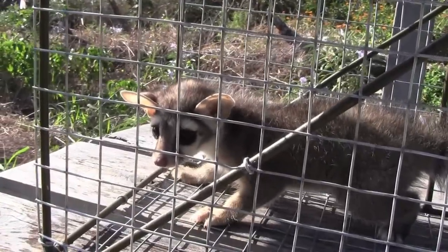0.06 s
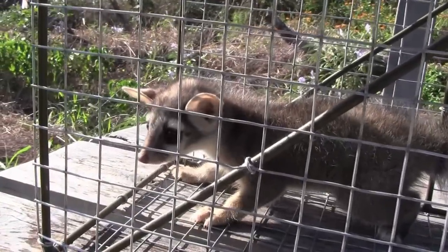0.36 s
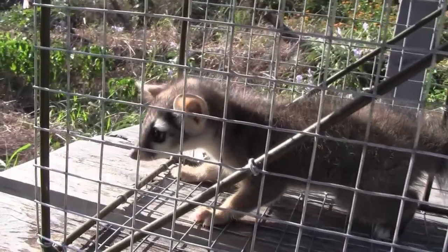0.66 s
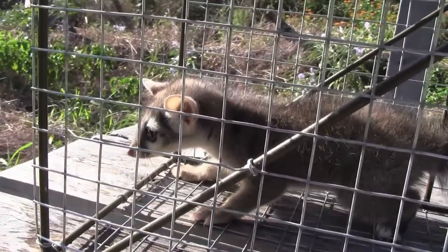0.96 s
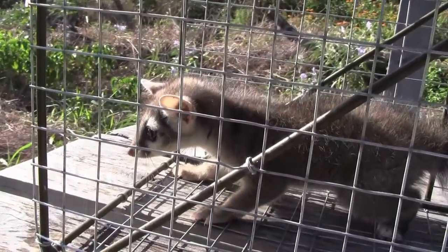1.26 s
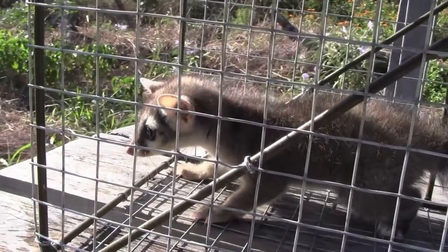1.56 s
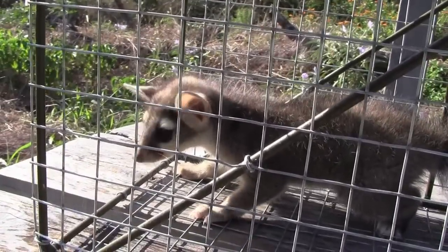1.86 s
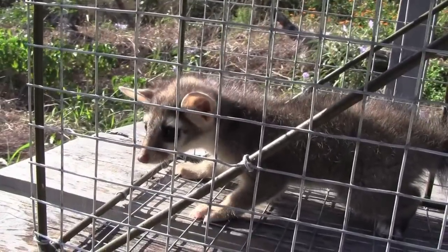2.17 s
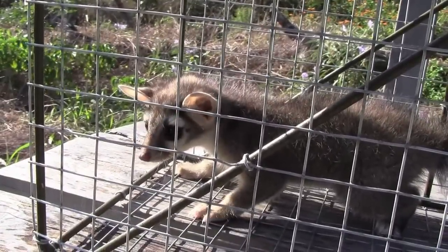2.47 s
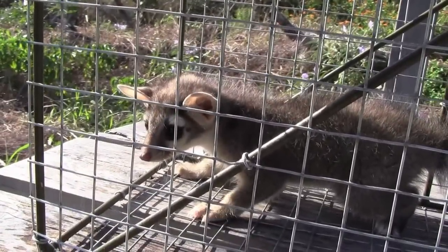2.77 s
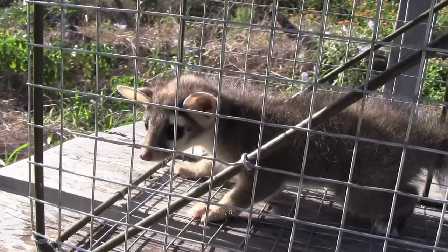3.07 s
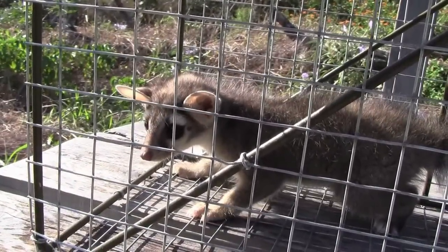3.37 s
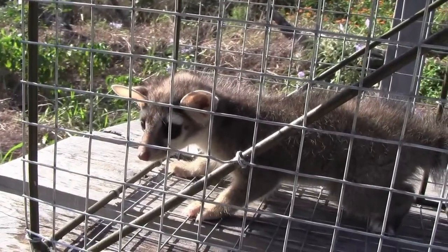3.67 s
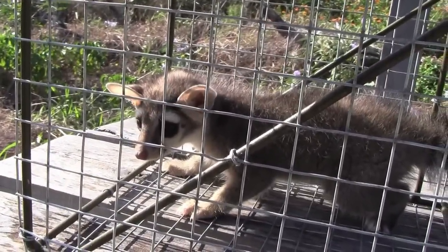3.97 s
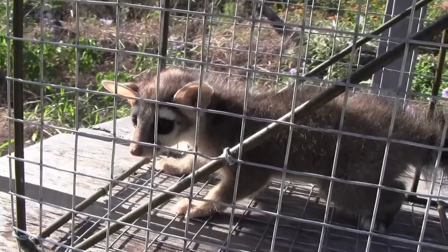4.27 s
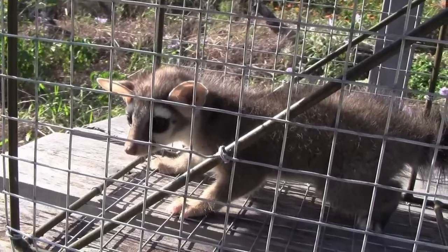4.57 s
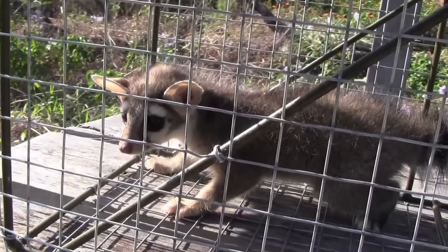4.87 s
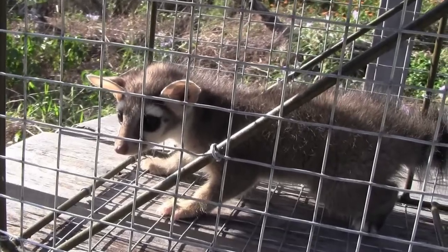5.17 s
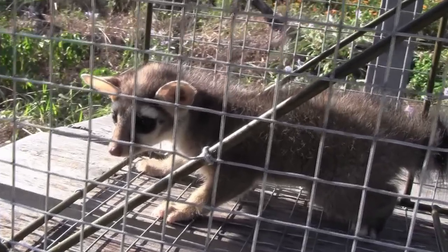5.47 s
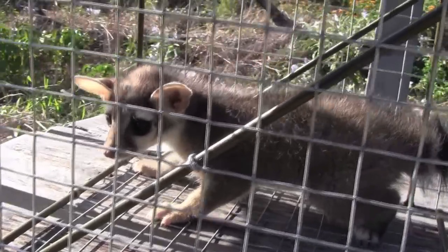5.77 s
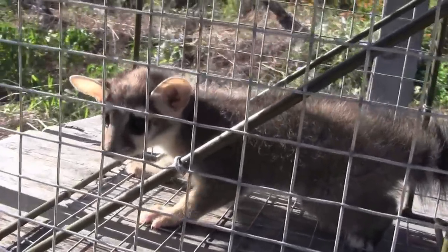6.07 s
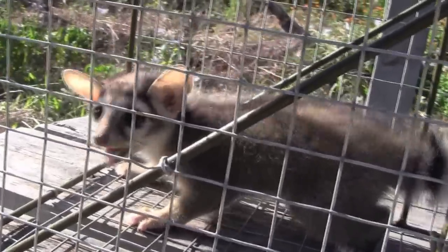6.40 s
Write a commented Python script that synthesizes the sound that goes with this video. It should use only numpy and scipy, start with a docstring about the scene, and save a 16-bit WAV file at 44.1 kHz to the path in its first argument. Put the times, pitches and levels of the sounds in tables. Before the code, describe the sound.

A small caged animal gives faint, short barking chirps in a quiet garden, then scrabbles, hisses and breaks into a loud, harsh bark.

```python
"""A garden hushes and far birds sing. From about 1 s a small wild mammal, close by in a wire cage,
gives eight faint barking chirps, each a short creak of the throat that ends in a hollow pip.
Near 5.9 s its claws start to tick on the cage and its fur brushes the wire. At 6.3 s it hisses
through its opening mouth, and in the last instant it breaks into a loud, harsh bark."""
import sys
import numpy as np
from scipy import signal
from scipy.fft import rfft, irfft
from scipy.io import wavfile
from scipy.ndimage import uniform_filter1d

SR = 44100
rng = np.random.default_rng(int(sys.argv[2]) if len(sys.argv) > 2 else 0)


def materialize(psi):
    """Save the field psi as 16-bit PCM at rate SR to the path in sys.argv[1].

    A 1-D psi becomes a single channel; in a 2-D psi each row is a channel.
    """
    bounded = np.clip(np.atleast_2d(psi).T, -1, 1)
    quanta = np.round(bounded * 32767).astype(np.int16)
    wavfile.write(sys.argv[1], SR, quanta)


N = 292721


def gain_of(db):
    """Decibels to gain."""
    return 10 ** (np.asarray(db) / 20)


def unit_rms(x):
    """Scaled to rms 1."""
    return x / np.sqrt(np.mean(x ** 2) + 1e-20)


def ramp(t, start, length):
    """Rises evenly from 0 to 1 over length, beginning at start."""
    return np.clip((t - start) / length, 0, 1)


def curve_at(points, hz):
    """Reads a curve on a log-frequency axis."""
    f, value = np.transpose(points)
    return np.interp(np.log(hz + 1), np.log(f + 1), value)


def add(mix, s, sound):
    """Mixes a sound in at time s."""
    part = mix[max(round(s * SR), 0):][:len(sound)]
    part += sound[:len(part)]


def eq(x, points, size=4096):
    """Causal filter of unit energy, shaped by points of f/Hz, level/dB."""
    log_gain = np.log(gain_of(curve_at(points, abs(np.fft.fftfreq(size, 1 / SR)))))
    ring = np.fft.ifft(np.exp(np.conj(signal.hilbert(log_gain)))).real[:size // 2]
    return signal.fftconvolve(x, ring / np.linalg.norm(ring))[:len(x)]


def wander(count, hz):
    """Smooth random modulation, rms about 1, moving at up to about hz."""
    f = np.fft.rfftfreq(SR, 1 / SR)
    return unit_rms(irfft(rfft(rng.standard_normal(SR)) * np.exp(-(f / hz) ** 2), SR))[:count]


def pan(x, right_db):
    """Mono to stereo, louder on the right by right_db."""
    return x * gain_of([[-right_db / 2], [right_db / 2]])


def reverb(x, t60, predelay):
    """Scattered reflections, different at each ear."""
    t = np.arange(SR // 2) / SR
    taps = rng.standard_normal((2, len(t))) * gain_of(-60 * t / t60) * (t > predelay)
    return signal.fftconvolve(x[None], taps / np.linalg.norm(taps[0]), axes=1)[:, :N]


# tone of the background bed: f/Hz, relative level/dB
GARDEN_EQ = [(22, -32), (40, -35), (72, -11), (150, -0.5), (250, -8), (400, -10), (560, -7), (800, -7),
             (1250, -10.5), (2000, -18.5), (3200, -25), (5500, -30), (12000, -34.5), (14800, -47.5)]
# its stereo width: f/Hz, left-right correlation
GARDEN_CORRELATION = [(60, 0.78), (130, 1), (290, -0.3), (630, 0.0014), (1370, 0.37), (3000, 0.13),
                      (6550, 0.32), (14300, -0.71)]
# its balance: f/Hz, left over right/dB
GARDEN_BALANCE = [(100, 0.47), (370, -1.2), (900, -2.13), (2300, -0.67), (7800, -0.98), (14300, 1)]
# slow fader ride on its mids, taken about the mean: t/s, level/dB
HUSH_RIDE = [(0.0, -57), (0.37, -57), (1.14, -55.5), (1.75, -58), (2.56, -56.5), (3.44, -57), (3.96, -56),
             (5.51, -58), (6.3, -55.5)]


def garden(level_db=-55, patchy_db=1.0, hush_lift_db=2.3):
    """Distant rumble and wide hush. A faint high background hiss is turned down from about 4.4 s."""
    frames, hz = N // 512 + 5, np.fft.rfftfreq(2048, 1 / SR)
    t = np.arange(frames) * 512 / SR
    a, b, c, d, patches = rng.standard_normal((frames, len(hz), 5)).T
    patches = unit_rms(uniform_filter1d(uniform_filter1d(patches, size=16, axis=0), size=8, axis=1))
    shared = np.clip(curve_at(GARDEN_CORRELATION, hz), -1, 1)[:, None]
    left = a + 1j * b
    right = shared * left + np.sqrt(1 - shared ** 2) * (c + 1j * d)
    balance = gain_of(np.outer([.5, -.5], curve_at(GARDEN_BALANCE, hz)))[:, :, None]
    spectra = np.array([left, right]) * balance / np.sqrt(.744 + shared)
    # each band follows the two rides to its own depth
    s, ride_db = np.transpose(HUSH_RIDE)
    hush_ride = np.interp(t, s, ride_db - ride_db.mean() + hush_lift_db)
    high_hiss_ride = 6.8 - 11.1 * ramp(t, start=4.35, length=.35)
    hush = np.outer(curve_at([(200, .52), (600, .9), (2000, .95), (6000, .25)], hz), hush_ride)
    high_hiss = np.outer(curve_at([(4000, .0055), (8000, .12), (12500, .65)], hz), high_hiss_ride)
    spectra *= gain_of(curve_at(GARDEN_EQ, hz)[:, None] + hush + high_hiss + patchy_db * patches)
    air = signal.istft(spectra, nperseg=2048, noverlap=1536)[1][:, :N]
    return gain_of(level_db) * air / air.mean(0).std()


def whistle(length, first_hz, middle_hz, last_hz, level_db, buzz):
    """A gliding tone; buzz shakes its pitch into a blurred twitter."""
    u = np.linspace(0, 1, round(length * SR))
    glide = np.polyval(np.polyfit([0, .5, 1], [first_hz, middle_hz, last_hz], 2), u)
    hz = glide * (1 + .095 * buzz * wander(len(u), 380))
    flutter = gain_of(2.5 * wander(len(u), 45))
    fade = signal.windows.tukey(len(u), .4)
    return gain_of(level_db) * unit_rms(np.sin(2 * np.pi * np.cumsum(hz) / SR) * flutter * fade)


def warble(start_s=.89, length_s=.75, notes_per_s=8, note_s=.04, centre_hz=3330):
    """A bird's run of short notes, growing louder, each sliding up or down around its own pitch."""
    out = np.zeros(N)
    starts = np.arange(0, length_s, 1 / notes_per_s)
    for s, (late, pitch, slide) in zip(starts, rng.uniform(-.91, 1, (len(starts), 3))):
        hz, glide = centre_hz * (1 + .17 * pitch), .049 * slide
        level_db = np.interp(s, [0, length_s], [-70, -67])
        note = whistle(note_s, hz * (1 - glide), hz, hz * (1 + glide), level_db, buzz=.2)
        add(out, start_s + s + late * note_s / 2, note)
    return out


# slurred bird whistles: t/s, length/s, first f/Hz, last f/Hz, pre-fader level/dB, buzz/0-1
BIRD_SLURS = [(1.269, 0.046, 2650, 2880, -60, 0.3), (1.404, 0.035, 3180, 3450, -64, 0.2),
              (1.491, 0.065, 4540, 3400, -62, 0.5), (2.675, 0.07, 3410, 3530, -60, 0.03),
              (2.756, .17, 3540, 3780, -63.5, 0.18), (5.071, 0.1, 2560, 3010, -64, 0),
              (5.081, .07, 4580, 4900, -65, .2), (5.104, .07, 5620, 5860, -68.5, .1),
              (5.243, 0.11, 4080, 3510, -58.5, 0.03), (5.387, 0.032, 3540, 3450, -62.5, .05)]
# buzzy twitters that arch in pitch: t/s, length/s, top f/Hz, pre-fader level/dB
BIRD_TWITTERS = [(1.733, .18, 3940, -63.5), (3.118, 0.17, 4120, -66), (3.957, .1, 4020, -62.5),
                 (4.121, .12, 3970, -63), (4.167, .09, 5800, -65.5), (4.704, .126, 4070, -64.5)]


def birds(slur_arch=1.018, twitter_sag=.07, dry_db=-6.5, wet_db=-11.5):
    """Far songbirds warble, whistle and twitter, blurred by the trees."""
    out = warble()
    for s, length, first_hz, last_hz, level_db, buzz in BIRD_SLURS:
        middle_hz = slur_arch * (first_hz + last_hz) / 2
        add(out, s, whistle(length, first_hz, middle_hz, last_hz, level_db, buzz))
    for s, length, top_hz, level_db in BIRD_TWITTERS:
        ends_hz = top_hz * (1 - twitter_sag)
        add(out, s, whistle(length, ends_hz, top_hz, ends_hz, level_db, buzz=.58))
    trees = reverb(out, t60=.435, predelay=.01074)
    return gain_of(dry_db) * pan(out, right_db=1.5) + gain_of(wet_db) * trees


def brush(length, hz, level_db, grain_db=4):
    """One rub: a short swell of grainy noise."""
    count = round(length * SR)
    grains = rng.standard_normal(count) * gain_of(grain_db * wander(count, 203))
    sound = eq(grains, [(hz / 2, -22), (hz / 1.2, 0), (hz * 1.1, 0), (hz * 1.7, -14), (hz * 4, -35)])
    return gain_of(level_db) * unit_rms(sound * np.hanning(count))


# fur on the wire: t/s, length/s, centre f/Hz, level/dB
FUR_BRUSHES = [(3.272, .061, 7160, -75), (4.803, .073, 6560, -78), (5.322, .095, 11000, -77.5),
               (5.735, .14, 7500, -77), (5.977, .172, 5950, -70), (6.26, 0.13, 3900, -70)]


def rustles():
    """Fur brushes the wire, and a paw slides on the boards at the first step."""
    out = np.zeros(N)
    for s, length, hz, level_db in FUR_BRUSHES:
        add(out, s, brush(length, hz, level_db))
    add(out, CLAW_STEPS[0][0], brush(length=.078, hz=805, level_db=-58))
    return out


def tick(peak_db, hz, t60, scrape=.16):
    """One claw lands: a sharp contact and a short, dry scrape."""
    t = np.arange(SR // 20) / SR
    contact = (t == 0) + scrape * rng.standard_normal(len(t)) * gain_of(-60 * t / t60)
    sound = eq(contact, [(hz / 8, -18), (hz / 1.7, -1), (hz * 1.5, -1), (hz * 3, -18), (hz * 8, -40)])
    return gain_of(peak_db) * sound / abs(sound).max()


# firm claw hits: t/s, peak level/dB, centre f/Hz, scrape t60/s
CLAW_STEPS = [(5.8742, -27.5, 2430, 0.011), (5.879, -28.5, 8800, 0.018), (6.0443, -34.5, 8460, .0045),
              (6.1569, -40.5, 600, 0.015), (6.2566, -37, 1290, 0.0076), (6.3037, -34.5, 1450, .0076),
              (6.4090, -29, 1355, .039), (6.471, -30, 2390, 0.013), (6.5860, -30, 4000, .006)]


def claws(shuffle_s=(5.88, 7.2), shuffle_per_s=14):
    """Firm steps on the cage, with lighter random ticks as the animal shifts its feet."""
    out = np.zeros(N)
    for s, peak_db, hz, t60 in CLAW_STEPS:
        add(out, s, tick(peak_db, hz, t60))
    times = np.arange(*shuffle_s, 1 / shuffle_per_s)
    for s, (late, size, pitch) in zip(times, rng.uniform(-.87, 1, (len(times), 3))):
        light = tick(peak_db=-44 + 3 * size, hz=4200 * 2 ** pitch, t60=.012)
        add(out, s + abs(late) / shuffle_per_s, light)
    return out


# dark tone of the throat, mouth shut: f/Hz, relative level/dB
SHUT_MOUTH_EQ = [(100, -52.5), (230, -0.5), (340, 7.5), (520, 10.5), (760, 2), (1000, 2.5), (1350, -16),
                 (2000, -30), (4000, -76)]
# thin lisp of air through the teeth: f/Hz, relative level/dB
LISP_EQ = [(3000, -20.5), (5800, -14), (7100, 1), (8300, 2), (10000, -0.5), (11500, -15), (14000, -16.5)]


def creak(count, level_db, ring_db, lisp_db, pulse_hz=191, growth_db=8, uneven_db=2.4,
          ring_hz=770, ring_t60=.035):
    """A few throat pulses that grow; air spits before each, and the last leaves the throat ringing."""
    t = np.arange(-.01, .07, 1 / SR)
    order = np.arange(count)
    starts = order / pulse_hz
    sizes_db = growth_db * (order / order[-1] - 1) + uneven_db * rng.standard_normal(count)
    pulses = np.zeros(len(t))
    pulses[np.searchsorted(t, starts)] = gain_of(sizes_db)
    # each pulse is a rounded push of pressure, muffled by the shut mouth
    muffle = gain_of(curve_at(SHUT_MOUTH_EQ, np.fft.rfftfreq(len(t), 1 / SR)))
    voice = irfft(rfft(pulses) * muffle, len(t))
    after = np.maximum(t - starts[-1], 0)
    ring = np.cos(2 * np.pi * ring_hz * after) * gain_of(ring_db - 60 * after / ring_t60) * after / .0035
    spits = .4 + 2 * np.cos(np.pi * (pulse_hz * t + .3)) ** 8
    puff = np.exp(-((t - starts[-1] / 2) / (.9 * starts[-1])) ** 4)
    flutter = gain_of(3 * wander(len(t), 150))
    air = eq(rng.standard_normal(len(t)), LISP_EQ) * spits * puff * flutter
    return gain_of(level_db) * (voice / abs(voice).max() + ring) + gain_of(lisp_db) * air


def pip(level_db, full_hz=751.6, full_db=-27.5, sag_hz_per_db=3, half_length_s=.0032, rise_per_s=20):
    """A hollow, rising tone of a few cycles; pushed harder, it sits higher and grows an octave."""
    t = np.arange(-.01, .01, 1 / SR)
    hz = full_hz - sag_hz_per_db * (full_db - level_db)
    phase = 2 * np.pi * np.cumsum(hz * (1 + rise_per_s * t)) / SR
    swell = gain_of(level_db) * np.exp(-abs(t / half_length_s) ** 3)
    return swell * (np.sin(phase) + 4.2 * swell * np.sin(2 * phase))


# chirp cues: first pulse t/s, pulse count, creak level/dB, ring gain on the creak/dB,
# lisp level/dB, pip delay/s, pip level/dB
CHIRP_CUES = [(0.9470, 4, -31.5, -10, -69.5, .0335, -33.5), (1.6043, 4, -31.5, -4, -78, .0346, -28.5),
              (2.3000, 5, -34.5, -6, -65.5, .026, -35), (2.9898, 4, -31, -13, -69.5, .0285, -30),
              (3.5917, 5, -29.5, -11, -65, .0377, -27), (4.1925, 5, -34, -14, -71.5, .0372, -41),
              (4.7131, 6, -31.5, -29, -66, .0437, -36), (5.6724, 3, -34.5, -10, -72.5, .028, -44)]


def chirps(preroll_s=.01):
    """Each chirp: a thin rising squeak of air, the creak, the pip."""
    out = np.zeros(N)
    for s, count, creak_db, ring_db, lisp_db, pip_delay, pip_db in CHIRP_CUES:
        squeak = whistle(.0226, first_hz=5950, middle_hz=6400, last_hz=6650, level_db=-76, buzz=.15)
        add(out, s - .03, squeak)
        add(out, s - preroll_s, creak(count, creak_db, ring_db, lisp_db))
        add(out, s + pip_delay - preroll_s, pip(pip_db))
    return out


# broad rush of breath: f/Hz, relative level/dB
BREATH_EQ = [(120, -28), (350, 1.5), (700, 4), (1300, 0.5), (2200, -1), (3200, -9.5), (5000, -13.5),
             (9000, -15.5), (12500, -19), (15000, -30)]
# whistling edge at the teeth: f/Hz, relative level/dB
TEETH_EQ = [(5000, -45), (6500, -5), (7300, 7), (7950, 4), (8500, -18), (10000, -35)]


def hiss(start_s=6.34, attack_s=.155, hold_s=.059, return_s=6.585, slack_db=-12, flutter_db=1.4):
    """Air rushes through the mouth, easing just before the bark; more flow, more whistle at the teeth."""
    t = np.arange(N - round(start_s * SR)) / SR
    slack = ramp(t, attack_s + hold_s, .012) - ramp(t, return_s - start_s, .025)
    flow = ramp(t, 0, attack_s) * gain_of(slack_db * slack)
    breath, teeth = gain_of(-43.5) * flow, gain_of(-52) * flow ** 1.4
    out = np.zeros(N)
    for envelope, tone in [(breath, BREATH_EQ), (teeth, TEETH_EQ)]:
        flutter = gain_of(flutter_db * wander(len(t), 120))
        add(out, start_s, envelope * flutter * eq(rng.standard_normal(len(t)), tone))
    return out


# bright formants of the throat, mouth wide open: f/Hz, relative level/dB
OPEN_MOUTH_EQ = [(100, -36), (240, -26), (360, -7.5), (490, -15.5), (750, -5.5), (1200, -6.5), (1480, 2),
                 (2600, .5), (3100, -4), (3450, -24), (3780, 0), (4400, -4.5), (5400, -19), (6600, -10),
                 (7600, -13.5), (8900, -32), (9600, -14.5), (11300, -13.5), (11800, -21), (13700, -28),
                 (15000, -39)]


def bark(start_s=6.6005, hz=368.6, jitter=.07, rough=.67, level_db=-13, jolt_db=-16.5, attack_s=.018,
         throb_hz=54.6, throb_db=2.5, shut_hz=1790, opening_s=.015):
    """The throat driven hard: uneven pulses and puffs of turbulence, brighter as the mouth opens."""
    t = np.arange(SR // 20) / SR
    cycles = np.cumsum(hz * (1 + jitter * wander(len(t), 200))) / SR
    pulses = np.diff(np.floor(cycles), prepend=-1)
    puffs = (.5 + np.exp(-(cycles % 1) / .3)) * rng.standard_normal(len(t))
    source = (1 - rough) * unit_rms(pulses) + rough * unit_rms(puffs)
    bright = unit_rms(eq(source, OPEN_MOUTH_EQ))
    dull = signal.lfilter(*signal.butter(1, shut_hz, fs=SR), bright)
    voice = dull + ramp(t, 0, opening_s) * (bright - dull)
    # swells from a first jolt to full effort, throbbing as it goes
    effort = ramp(t, 0, attack_s)
    throb = np.cos(2 * np.pi * throb_hz * (t - attack_s))
    envelope = gain_of(level_db + jolt_db * (1 - effort) + throb_db * throb * effort)
    out = np.zeros(N)
    add(out, start_s, envelope * voice)
    return out


def delay_right(pair, lag_s=.0000108):
    """Near sound reaches the right microphone port a moment after the left."""
    lag = np.sinc(np.arange(-16, 17) - lag_s * SR) * np.hanning(33)
    return np.array([pair[0], np.convolve(pair[1], lag, "same")])


def scene():
    """The garden and birds behind; the animal up front, a little to the right and nearly dry."""
    calls = chirps()
    outburst = hiss() + bark() + claws() + rustles()
    near = delay_right(pan(calls, right_db=3) + pan(outburst, right_db=1.3))
    reflections = gain_of(-16.5) * reverb(calls + outburst, t60=.03, predelay=.0047)
    return garden() + birds() + reflections + near


def record(dry, ceiling=.95, cutoff_hz=15400):
    """Soft-clips the loudest peaks, then cuts the extreme top."""
    rounded = dry / (1 + (dry / ceiling) ** 4) ** .25
    lowpass = signal.firwin(255, cutoff_hz, window=("kaiser", 8), fs=SR)
    return signal.oaconvolve(rounded, lowpass[None], "same")


dry = scene()
out = record(dry)
materialize(out)
```